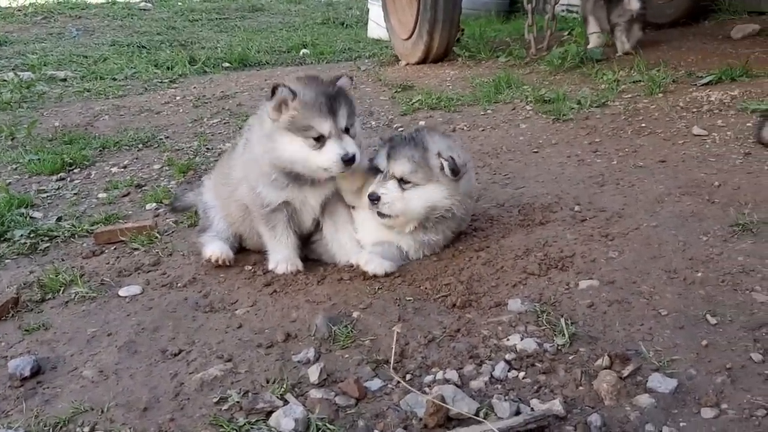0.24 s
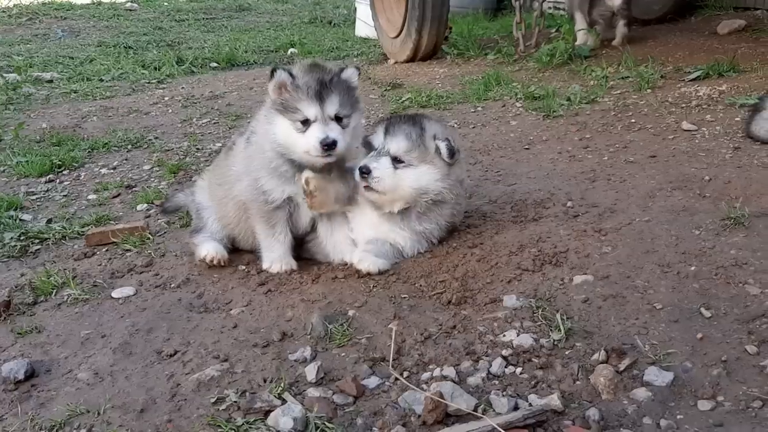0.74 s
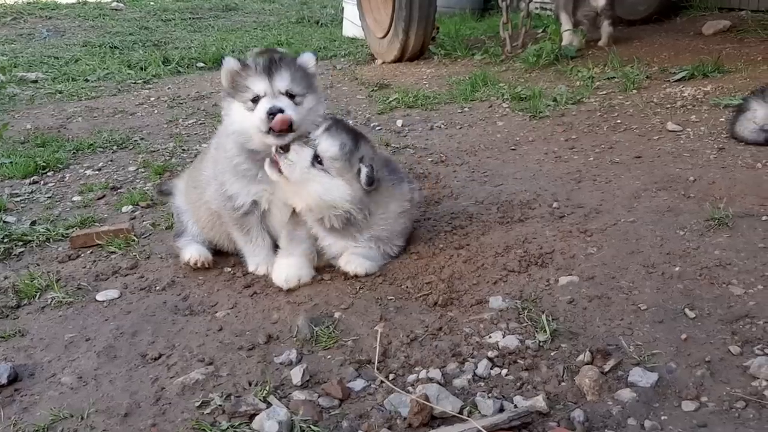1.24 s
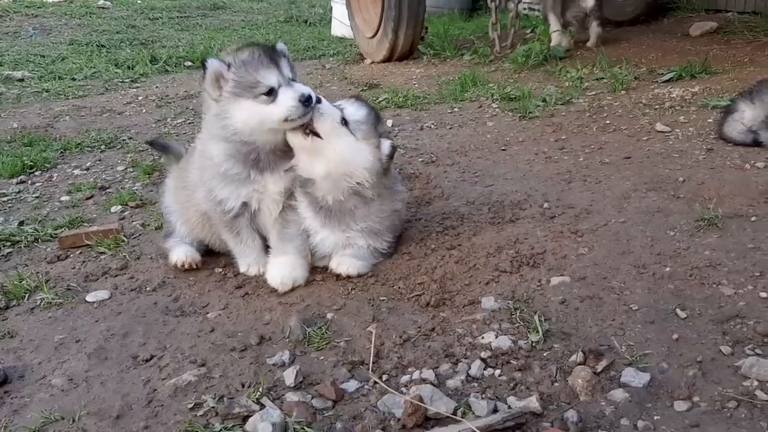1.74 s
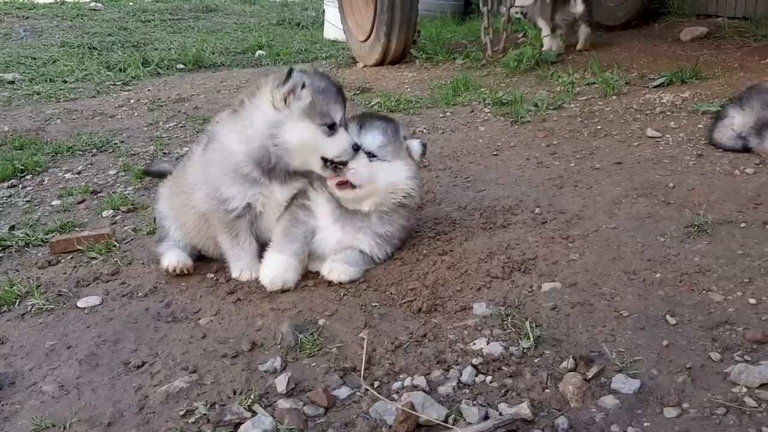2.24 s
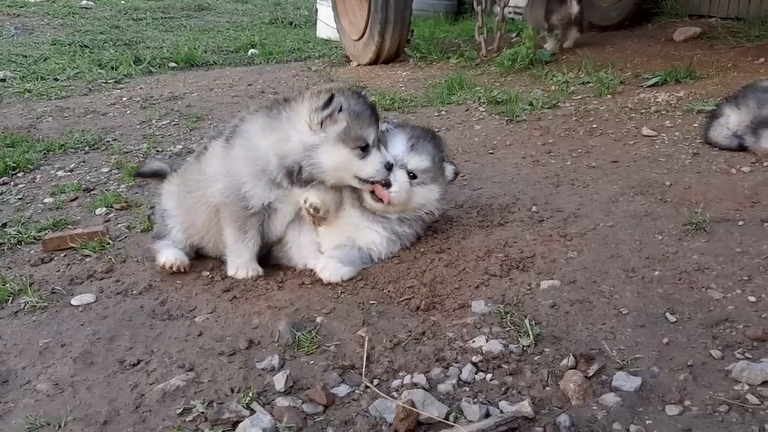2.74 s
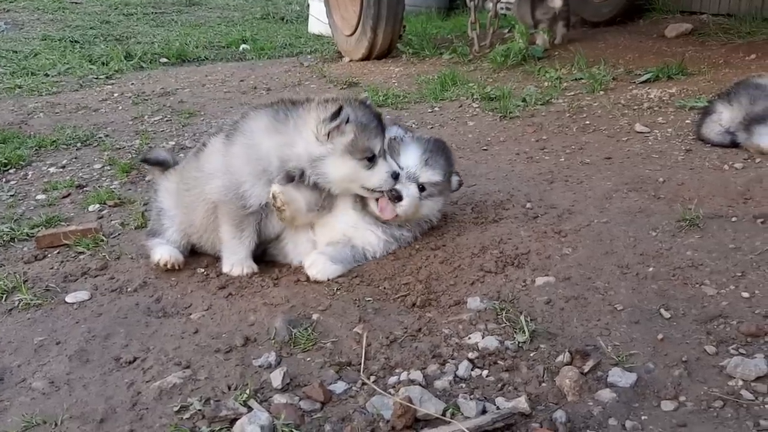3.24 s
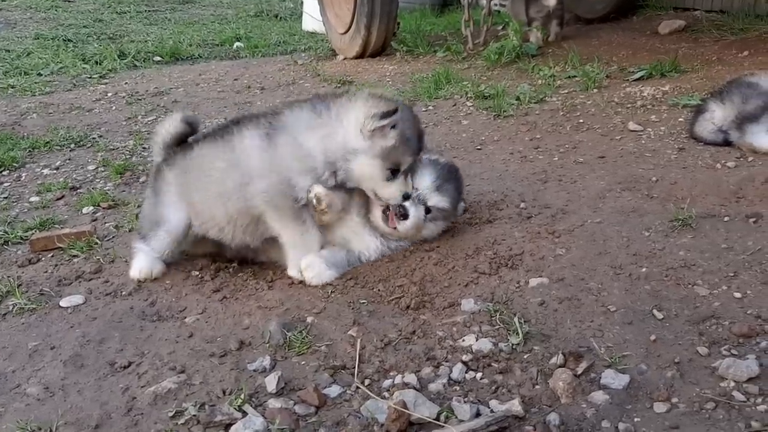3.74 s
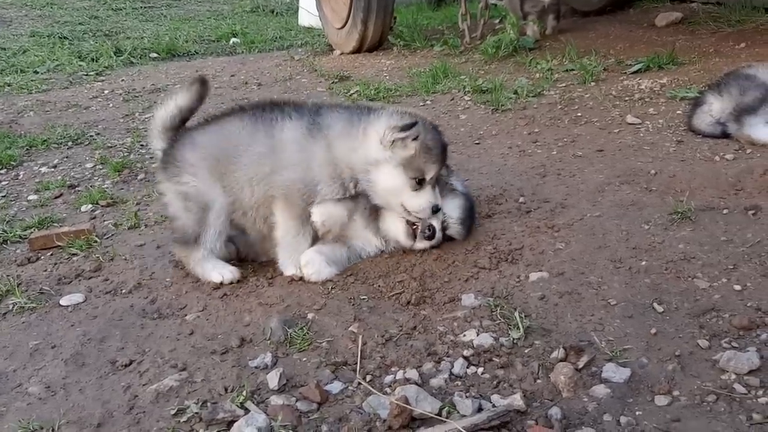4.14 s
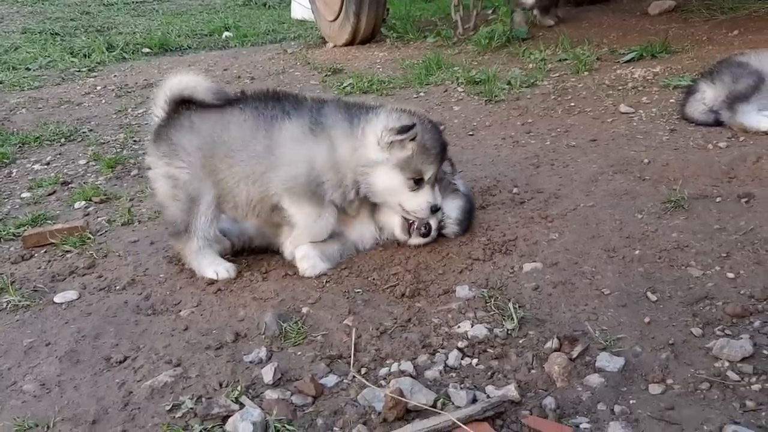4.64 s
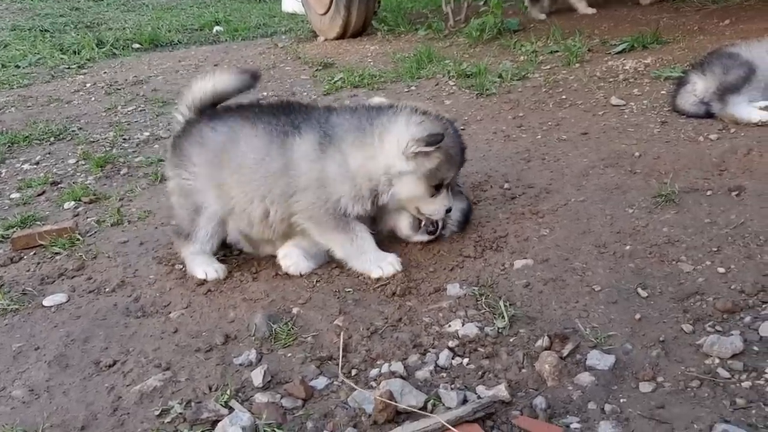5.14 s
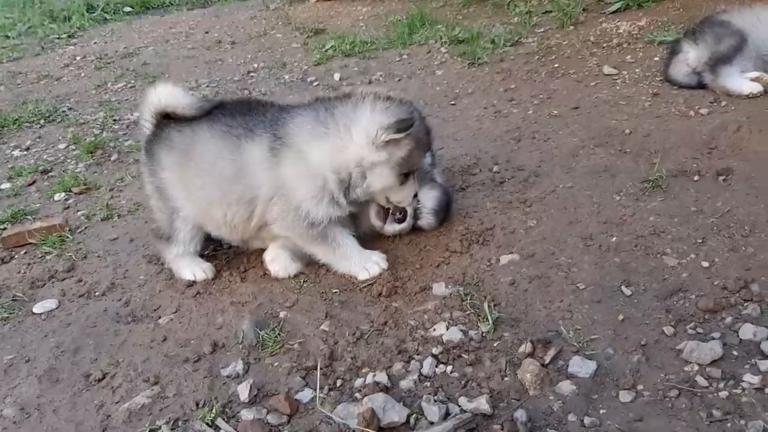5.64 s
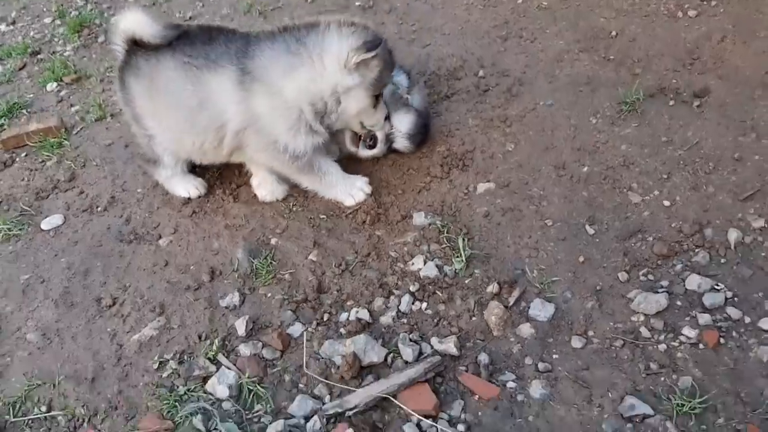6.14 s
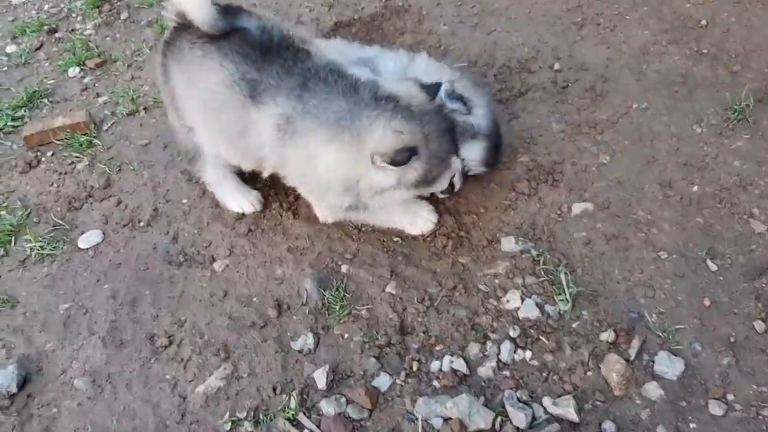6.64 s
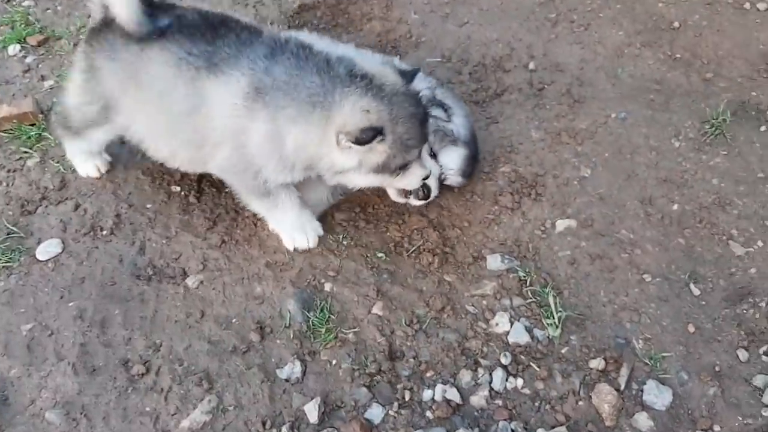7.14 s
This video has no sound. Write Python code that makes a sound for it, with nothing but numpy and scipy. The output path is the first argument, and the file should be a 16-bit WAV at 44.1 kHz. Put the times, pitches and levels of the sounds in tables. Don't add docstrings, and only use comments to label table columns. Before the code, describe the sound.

Outdoors, a puppy's quiet scuffle and tiny whimpers give way to four piercing, drawn-out whines, ending amid low wind thumps on the left.

```python
import sys
import numpy as np
from scipy import signal
from scipy.fft import rfft, irfft
from scipy.io import wavfile
from scipy.ndimage import uniform_filter1d

SR = 44100
rng = np.random.default_rng(int(sys.argv[2]) if len(sys.argv) > 2 else 0)


def boost(x):
    u = np.asarray(x, float) / 20
    return 10 ** u


def unload_wav(signal):
    wavfile.write(
        sys.argv[1],
        SR,
        np.round(np.clip(np.atleast_2d(signal).T, -1, 1) * 32767).astype(np.int16),
    )


N = 325458

# start/s, end/s, hoarse onset/0-1, onset length/s, hoarse ending/0-1
WHINES = [
    (3.647, 4.087, .1, .02, .6),
    (4.252, 5.668, .5, .03, .5),
    (5.845, 6.759, .3, .28, .8),
    (6.93, 7.378, .75, .16, .3),
]
CRACKS = [.12, .03, .03, .2]
# t/s, f/Hz
FOLD_PITCH = [
    [(3.647, 1350), (3.671, 1287), (3.7, 1378), (3.968, 1420), (3.988, 1336), (4.05, 1422), (4.072, 1346),
     (4.087, 1192)],
    [(4.252, 1262), (4.284, 1297), (4.306, 1363), (4.354, 1379), (4.7, 1325), (4.748, 1308)],
    [(4.762, 1272), (4.802, 1291), (4.818, 1231), (4.846, 1235), (4.888, 1180), (4.924, 1178),
     (4.953, 1239), (4.982, 1244), (5.044, 1174)],
    [(5.15, 1120), (5.384, 1152), (5.485, 1247), (5.565, 1228), (5.606, 1309), (5.645, 1303), (5.659, 1173),
     (5.668, 1195)],
    [(5.845, 1103), (5.873, 1121), (5.899, 1257), (5.921, 1354), (5.955, 1332), (6.045, 1409),
     (6.062, 1408), (6.119, 1301), (6.21, 1262)],
    [(6.3, 1291), (6.425, 1274), (6.489, 1295), (6.635, 1280), (6.7, 1314), (6.736, 1303), (6.743, 1234),
     (6.759, 1054)],
    [(6.93, 983), (6.947, 1029), (7.01, 1260), (7.06, 1244), (7.09, 1291), (7.102, 1341), (7.155, 1361),
     (7.245, 1269), (7.378, 1242)],
]
# t/s, level/dB
EFFORT = [
    [(3.647, -50.5), (3.671, -38), (3.778, -37), (3.892, -28), (3.985, -22.5), (4.012, -27), (4.03, -26),
     (4.075, -27), (4.087, -25.5)],
    [(4.252, -36), (4.276, -27.5), (4.368, -39), (4.502, -28), (4.544, -35.5), (4.649, -37), (4.75, -22.5)],
    [(4.764, -19.5), (4.793, -17), (4.829, -24), (4.886, -29), (4.98, -21), (5.095, -26.5), (5.154, -31.5)],
    [(5.396, -22.5), (5.467, -17.5), (5.517, -22.5), (5.559, -20.5), (5.638, -25), (5.659, -18),
     (5.668, -32)],
    [(5.845, -35), (5.877, -26), (5.898, -33), (5.92, -27.5), (6.013, -25.5), (6.056, -19), (6.092, -20),
     (6.209, -40.5)],
    [(6.266, -28), (6.387, -26), (6.451, -31.5), (6.487, -24.5), (6.66, -19), (6.729, -20.5), (6.759, -33)],
    [(6.93, -43.5), (6.968, -28), (6.996, -38.5), (7.026, -30), (7.042, -35.5), (7.158, -18.5),
     (7.278, -27.5), (7.327, -38), (7.378, -33.5)],
]
# t/s, opening level/dB, throat f/Hz, mouth f/Hz
MOUTH_EARLY = [
    [(3.647, -68.5, 2600, 4670), (3.72, -44.5, 3700, 4530), (3.82, -53, 4350, 5570),
     (3.864, -43.5, 3320, 5390), (3.963, -47, 3330, 3780), (3.982, -27, 3000, 4460),
     (4.02, -24, 3470, 4370), (4.087, -67, 3540, 4650)],
    [(4.252, -60, 2360, 4070), (4.29, -55.5, 2700, 4850), (4.45, -52, 3300, 4800),
     (4.56, -56.5, 3300, 4800), (4.69, -57, 3540, 4770), (4.752, -49.5, 3120, 3650)],
    [(4.764, -35, 2060, 3700), (4.8, -34, 2150, 3820), (4.822, -20, 2200, 3560), (4.846, -22, 2090, 3650),
     (4.885, -16.5, 2520, 2720), (4.93, -21.5, 2440, 3060), (4.96, -27.5, 1600, 3930),
     (5.02, -33, 2370, 2810), (5.14, -39.5, 2300, 2500)],
    [(5.152, -56, 2250, 2390), (5.16, -56, 2290, 5600), (5.18, -36, 2300, 5650), (5.25, -28, 2170, 5000),
     (5.424, -30.5, 2360, 5110), (5.446, -26.5, 2930, 3950), (5.588, -19.5, 3400, 4340),
     (5.638, -35.5, 2690, 4800), (5.668, -42, 2980, 3500)],
]
# t/s, opening level/dB, throat f/Hz, mouth f/Hz
MOUTH_LATE = [
    [(5.845, -49, 1930, 3940), (5.905, -17, 3560, 4380), (6.015, -22, 3770, 4750),
     (6.03, -15.5, 3630, 4550), (6.128, -33, 3500, 4640), (6.22, -34, 3500, 4080)],
    [(6.29, -26, 3440, 4540), (6.34, -34, 3080, 5000), (6.37, -28, 3060, 6100), (6.39, -26.5, 2920, 5970),
     (6.636, -26, 3070, 5620), (6.729, -27, 3310, 5990), (6.759, -36, 2000, 5700)],
    [(6.93, -49, 1930, 4530), (6.96, -23.5, 2880, 6000), (7.09, -23.5, 3470, 5830),
     (7.104, -16, 3680, 6050), (7.165, -22, 3930, 6140), (7.25, -28.5, 3240, 5900),
     (7.378, -28, 3320, 5500)],
]
# t/s, lips level/dB, teeth level/dB, teeth f/Hz
LIPS_AND_TEETH = [
    [(3.647, -12, 0, 11200), (3.807, -3, -4, 11300), (3.847, -3, 7.5, 9700), (3.969, -1, 2, 9650),
     (4.087, -2, 18, 11300)],
    [(4.252, -27, 18, 11600), (4.308, 1, -11, 10900), (4.454, -2, -12, 12700), (4.482, 1, -3.5, 10900),
     (4.72, -4.5, 2, 11000), (4.75, -6, 9, 10900)],
    [(4.76, 0, -1, 11100), (4.818, -1.5, 5.5, 9300), (5.026, -5, 3, 10100), (5.056, -4, 5.5, 9400),
     (5.14, 5, 7, 9900)],
    [(5.15, 0, 5, 10400), (5.344, -1, -13, 11900), (5.382, -5, 0, 10500), (5.668, 1, 4, 12400)],
    [(5.845, -6, 0, 11400), (5.878, 18.5, -2, 11600), (5.9, -9, 3, 11600), (6.069, -17, -5.5, 11300),
     (6.157, 3, 11, 9500), (6.24, -11, 5, 9800)],
    [(6.26, -7, 0, 10400), (6.314, -10.5, 2.5, 10100), (6.444, -7, -4.5, 12000), (6.49, 2, -1.5, 14000),
     (6.66, -2.5, 5, 13400), (6.759, 2.5, -3, 12700)],
    [(6.93, 3, -3, 11600), (7.01, -7, -9, 12500), (7.058, -4, 4, 11400), (7.15, -6, -9, 13000),
     (7.378, -2, -10, 11800)],
]
# f/Hz, level/dB
UPPER_TONE = [(5000, -34), (6200, -12), (7500, -7), (8700, -20.5), (10000, -21), (12500, -19.5),
              (15000, -23), (16500, -24)]
# t/s, left-right level/dB
HEAD_TURN = [
    [(3.647, -1), (3.867, 23), (3.995, 4), (4.041, 13), (4.087, -1)],
    [(4.252, -3.5), (4.35, 6), (4.734, -6), (4.846, 4), (4.972, -4.5), (5.072, 4.5), (5.488, -0.5),
     (5.63, 3)],
    [(5.845, 1), (6.067, 5), (6.157, 11), (6.675, 3), (6.723, 10), (6.759, 0)],
    [(6.93, -1), (7.05, 6), (7.262, 11.5), (7.378, -1)],
]
# t/s, left-right level/dB
OVERTONE_PAN = [(3.9, 2.5), (6.4, 3.5), (7.05, 7), (7.3, 5.5)]
# start/s, end/s, depth/0-1
SKIPPED_BEATS = [(3.307, 3.317, 0.55), (3.418, 3.436, .3), (4.262, 4.279, .14), (4.288, 4.32, 0.04),
                 (3.968, 3.985, 0), (6.935, 6.935, 0.75)]
# t/s, f/Hz, level/dB
WHIMPERS = [
    [(.264, 548, -69), (.268, 535, -38), (.273, 478, -79)],
    [(.296, 590, -53), (.302, 590, -52), (.314, 453, -55), (.332, 437, -54), (.346, 576, -49.5),
     (.352, 610, -56)],
    [(2.63, 920, -58), (2.644, 830, -48), (2.658, 813, -50.5), (2.668, 740, -55)],
    [(2.976, 660, -47.5), (2.986, 581, -43.5), (3.02, 596, -37), (3.03, 611, -59), (3.048, 624, -56)],
    [(3.303, 1070, -59), (3.326, 1215, -46), (3.358, 1287, -47.5), (3.396, 1315, -48), (3.42, 1183, -41.5),
     (3.432, 1050, -65)],
    [(3.445, 1037, -69), (3.46, 950, -49), (3.47, 840, -59)],
]
WHIMPER_OCTAVES = [-14, -17, -26, -25, -40, -24]
# peak t/s, airflow level/dB, half length/s
BREATHS = [(1.24, -74, 0.56), (1.56, -73, .07), (1.88, -71, 0.18), (2.8, -64.5, 0.057), (3.1, -66.5, 0.13),
           (3.27, -66, 0.2), (3.43, -59.5, 0.052), (3.57, -69.5, 0.032), (3.715, -57.5, 0.041),
           (3.85, -58, 0.11), (4, -58, 0.15), (4.14, -58, 0.074), (4.27, -57, 0.034), (4.44, -58, 0.06),
           (4.58, -56, 0.041), (4.89, -61.5, 0.4), (5.3, -64.5, 1), (5.67, -56, 0.037),
           (5.74, -61.5, 0.062), (6.1, -56.5, 0.06), (6.33, -58, 0.14), (6.6, -65, 0.51),
           (6.75, -55.5, 0.12), (6.94, -52, 0.0039), (7.05, -60.5, 0.16), (7.38, -58.5, 0.16)]
# f/Hz, level per Hz/dB
MUZZLE_TONE = [(300, -6.5), (700, 0), (1100, 2.5), (2100, 1.5), (2700, -9), (4500, -7), (7500, -18),
               (16500, -33)]
# peak t/s, rustle level/dB, half length/s
SCUFFLES = [(0, -67.5, 0.11), (.23, -74, 0.49), (.8, -72.5, 0.074), (1.2, -74.5, 0.6), (1.6, -74, 0.09),
            (1.9, -71.5, 0.23), (2.1, -74, 0.2), (2.55, -75.5, 0.27), (2.8, -69.5, 0.27), (3.42, -66, 0.1),
            (3.85, -61, 0.19), (4.04, -54, 0.063), (4.39, -56, 0.024), (4.9, -63, 0.63), (5.4, -63, 0.52),
            (5.66, -51, 0.03), (6.0, -57.5, 0.18), (6.3, -58.5, 0.38), (6.65, -57, 0.19),
            (6.74, -58, 0.051), (7.05, -59.5, 0.22), (7.3, -59.5, 0.43)]
# t/s, peak level/dB, ring f/Hz, treble level/dB
SMACKS = [(0.0024, -24, 4380, -12.5), (0.2216, -39, 4450, -34), (0.2325, -42, 4200, -40),
          (0.2642, -45.5, 4100, -7), (0.341, -44.5, 2370, -10), (0.382, -35, 2600, -10),
          (0.387, -29.5, 2700, -26), (0.3906, -22.5, 2600, -7), (0.398, -33, 2780, -16),
          (0.539, -47, 2490, -30), (0.5476, -24, 2350, -10.5), (0.5551, -29.5, 2480, -44),
          (0.563, -37.5, 2500, -25), (1.5048, -47, 1510, -35), (1.9736, -37.5, 1960, 0)]
# t/s, peak level/dB, ring f/Hz, treble level/dB
WIDE_TICKS = [(0.2116, -19, 4280, -1.5), (3.97, -30.5, 2040, -28), (4.324, -29.5, 1670, -36),
              (4.756, -36, 2000, -32), (5.011, -28, 4030, -4), (5.018, -32, 4570, -16),
              (5.121, -32, 3120, -15), (5.171, -44, 3000, -32), (5.782, -32, 1490, -31),
              (6.328, -22.5, 3150, -36), (6.476, -16.5, 2380, -37), (6.708, -24.5, 996, -19),
              (6.722, -38, 3500, -16), (6.777, -35, 700, -39), (7.323, -32.5, 5050, 2.5)]
# t/s, peak level/dB, lowest f/Hz
GRIT = [(.435, -56, 9000), (.455, -53, 9500), (.789, -49, 4500), (1.012, -53, 4500), (1.056, -51, 4500),
        (1.18, -51, 8000), (1.516, -47, 7000), (1.594, -58, 6000), (1.66, -55, 9500), (1.783, -64, 2800),
        (1.832, -45, 5000), (2.105, -49, 9000), (2.475, -51, 6000), (2.5574, -54, 9000),
        (3.2465, -43, 6000), (3.588, -50.5, 6000), (3.627, -42, 9500), (4.084, -31, 7500),
        (4.347, -41.5, 9000), (4.3818, -46, 8000), (4.389, -44, 9000), (5.13, -38.5, 9000),
        (5.7981, -58, 8100), (6.72, -33, 6000), (6.8517, -43, 7940), (7.218, -45, 8000), (7.25, -37, 8000),
        (7.291, -33, 8000), (7.338, -35, 9000)]
# f/Hz, t60/s
WALL_DECAY = [(1300, 0.3), (4000, 0.24), (9000, 0.05)]
# peak t/s, level/dB, half length/s
GUSTS = [
    (6.165, -51.5, 0.016),
    (6.225, -42, 0.022),
    (6.39, -45.5, 0.094),
    (6.58, -53.5, 0.16),
    (6.745, -34, 0.038),
    (6.8, -34, 0.031),
    (7.2, -57.5, 0.27),
]
# f/Hz, level per Hz/dB
GUST_TONE = [(25, -34), (45, 4), (70, 9), (130, -1), (250, -11.5), (600, -37)]
# f/Hz, level per Hz/dB
YARD_TONE = [(25, -28.5), (60, 2), (300, -9), (2500, -7.5), (3000, -25.5), (7000, -31.5), (12500, -24),
             (16000, -36.5)]
# t/s, level/dB
RUMBLE = [(0, -65.5), (1.2, -64), (2.3, -69.5), (2.7, -66.5), (2.85, -56), (3.1, -62.5), (3.6, -68.5),
          (4.5, -67.5), (4.9, -68), (5.6, -78), (6.1, -81)]
# f/Hz, likeness/0-1
PORT_LIKENESS = [(200, 0.97), (900, 0.14)]
# f/Hz, left-right level/dB
PORT_BALANCE = [(300, -0.5), (2400, 2.5), (6000, -2.5), (9000, -10.5)]
# f/Hz, level/dB
PORT_DIP = [(1450, 2), (1750, -1.5), (2100, 2.5), (7700, 0.5), (8600, -11.5), (9700, -1.5), (15700, 3),
            (15900, -22)]


def whine():
    hz = uniform_filter1d(follow(np.vstack(FOLD_PITCH))[0], size=300)
    effort_db = uniform_filter1d(follow(np.vstack(EFFORT))[0], size=200)
    open_db, passed = mouth(hz)
    partial_db = [effort_db] + [open_db + 10 * np.log10(share) for share in passed]
    bright_db = -31.5 + 0.027 * (hz - hz.mean()) + 0.18 * effort_db
    bright_db = bright_db + 0.29 * (open_db + 10 * np.log10(sum(passed[:3])))
    lips_db, teeth_db, teeth_hz = uniform_filter1d(follow(np.vstack(LIPS_AND_TEETH)), size=200)
    low_pan, high_pan = follow(np.vstack(HEAD_TURN))[0], follow(OVERTONE_PAN)[0]
    turn = 2 * np.pi * np.cumsum(hz * (1 + 0.00317 * wander(60))) / SR
    hoarse, shared = hoarseness(), wander(110)
    calls = [row[:2] for row in WHINES]
    tired = gate([(start + 0.05, end - .025) for start, end in calls], 0.05, 0.025)
    out = np.zeros((2, N))
    for k in range(1, 14):
        if k <= 4:
            db = partial_db[k - 1]
        else:
            db = bright_db + read(UPPER_TONE, k * hz) + 3 * wander(14) - 5 * hoarse * (k > 6)
            ring_db = 20.5 * (1 / (1 + (2 * (k * hz - teeth_hz) / 4400) ** 2) - .5)
            db = db + np.where(k * hz < 8800, lips_db, teeth_db + ring_db)
        if k == 5:
            db = np.maximum(db, partial_db[4] - 24 + 10 * hoarse)
        if k == 1:
            pan = low_pan
            lead = .75 + .4 * wander(5)
            flutter_db = hoarse * 2 * shared
        else:
            pan = high_pan + read(PORT_BALANCE, k * hz) + 2.9 * wander(6)
            lead = 1.0 + .55 * wander(5)
            beading_db = 5 - 2 * shared ** 2 - 3 * wander(120) ** 2
            flutter_db = hoarse * (beading_db + (.3 + 1.1 * hoarse) * wander(1200))
        smear_db = 3 * wander(350) * (k > 6)
        level = np.sqrt(2) * boost(db + flutter_db + smear_db) / np.maximum(np.cos(lead / 2), .6)
        phase = k * turn + np.array([lead, -lead]) / 2 + k * k
        out += level * (1 if k <= 5 else tired) * sides(pan) * np.sin(phase)
    halves = np.sin(turn / 2) + boost(5 * wander(250)) * np.sin(1.5 * turn + .6 * wander(200))
    return (out + skipping() * boost(effort_db) * halves) * gate(calls, 0.0021, 0.0095)


def mouth(hz):
    open_db, *peaks_hz = uniform_filter1d(follow(np.vstack(MOUTH_EARLY + MOUTH_LATE)), size=80)
    passed = []
    for k in range(2, 6):
        resonance = sum((1 + (2 * (k * hz - peak) / 720) ** 2) ** -2 for peak in peaks_hz)
        passed.append(boost(-30) ** 2 + resonance)
    return open_db, passed


def hoarseness():
    clear, settle_s = .15, .05
    points = []
    for (start, end, onset, lasts, ending), crack in zip(WHINES, CRACKS):
        points += [(start, onset), (start + lasts, onset), (start + lasts + settle_s, clear)]
        points += [(end - crack - .015, clear), (end - crack, ending), (end, ending)]
    return follow(points)[0]


def skipping():
    return sum(np.clip(depth, 0, 1) * gate([(start, end)], 0.004, 0.0033)
               for start, end, depth in SKIPPED_BEATS)


def whimpers():
    points = [(*point, over) for rows, over in zip(WHIMPERS, WHIMPER_OCTAVES) for point in rows]
    hz, db, over_db = follow(points)
    turn = 2 * np.pi * np.cumsum(uniform_filter1d(hz, size=200) * (1 + 0.005 * wander(80))) / SR
    soft = gate([(rows[0][0], rows[-1][0]) for rows in WHIMPERS], .004, .006)
    tone = np.sin(turn) + skipping() * np.sin(turn / 2)
    tone += boost(over_db + 3 * wander(90)) * np.sin(2 * turn)
    tone += boost(np.maximum(over_db - 14, -28)) * np.sin(3 * turn)
    tone += boost(-25) * (wander(500) * np.sin(turn) + wander(900) * np.sin(2.3 * turn))
    return np.sqrt(2) * tone * boost(uniform_filter1d(db, size=150) + .8 * wander(120)) * soft


def panting():
    air = hiss(MUZZLE_TONE, (1600, 2100), lambda hz: 0.26 + 0 * hz, patchy_db=3.4)
    return air * swells(BREATHS)


def smacks():
    out, t = np.zeros((2, N + 2000)), np.arange(2000) / SR
    broad = signal.butter(2, (800, 3600), "bandpass", fs=SR, output="sos")
    treble = signal.butter(2, (6300, 15500), "bandpass", fs=SR, output="sos")
    snaps = [(*row, 750, .22) for row in SMACKS] + [(*row, 1700, .12) for row in WIDE_TICKS]
    for s, db, hz, treble_db, width, wet in snaps:
        decay = np.exp(-t / .0013) + wet * np.exp(-t / .0042)
        burst = rng.standard_normal((2, len(t))) * decay * np.minimum(t / .0006 + .3, 1)
        burst[1] = 0.6 * burst[0] + 0.8 * burst[1]
        r = np.exp(-np.pi * width / SR)
        hollow = [1, -2 * r * np.cos(2 * np.pi * hz / SR), r * r]
        ring = signal.lfilter([1, 0, -1], hollow, signal.lfilter([1], hollow, burst))
        puff = signal.sosfilt(broad, burst)
        spit = signal.sosfilt(treble, burst) * [[.5], [1.4]]
        snap = ring / abs(ring).max() + 0.18 * puff / abs(puff).max()
        snap = snap + boost(treble_db + 10) * spit / abs(spit).max()
        out[:, round(s * SR):][:, :len(t)] += boost(db - 0.5) * snap
    return out[:, :N]


def grit():
    out, t = np.zeros((2, N + 400)), np.arange(400) / SR
    for s, db, low_hz in GRIT:
        burst = rng.standard_normal((2, len(t))) * np.exp(-t / .001)
        band = signal.butter(2, (low_hz, 14500), "bandpass", fs=SR, output="sos")
        tick = signal.sosfilt(band, burst + burst[0])
        out[:, round(s * SR):][:, :len(t)] += boost(db) * tick / abs(tick).max() * [[.8], [1.6]]
    return out[:, :N]


def rustle():
    bright = [(2500, -11.5), (5000, -11.0), (8600, -10.5), (10000, -10.5), (12500, -5.5),
              (15600, -22), (16200, -22.0)]
    grain = boost(1.8 * wander(40))
    fizz = hiss(bright, (9000, 15500), lambda hz: .3 + 0 * hz, patchy_db=1.5)
    return fizz * grain * swells(SCUFFLES)


def wall(x):
    taps = np.zeros((2, SR // 2))
    at = np.arange(900, SR // 2 - 20, 20) + rng.integers(0, 20, (2, (SR // 2 - 901) // 20))
    np.put_along_axis(taps, at, rng.choice([-1., 1.], at.shape), 1)
    hz, t, z = signal.stft(taps, SR, nperseg=256)
    shed_db = 6.0 * np.exp(-((t - .055) / .018) ** 2)
    tail = signal.istft(z * boost(-60 * t / read(WALL_DECAY, hz)[:, None] + shed_db), SR, nperseg=256)[1]
    return signal.fftconvolve(x.mean(0)[None], tail / np.linalg.norm(tail[0]), axes=1)[:, :N]


def wind():
    z = rfft(rng.standard_normal((2, N))) * boost(read(GUST_TONE, np.fft.rfftfreq(N, 1 / SR)))
    lumps = boost(2.0 * np.array([wander(40), wander(6.3)]))
    facing = 1.4 * sides(12.)[:, None]
    return evened(irfft(z, N) * lumps) * swells(GUSTS) * facing


def yard():
    floor = boost(-66.5) * hiss(YARD_TONE, (30, 16000), lambda hz: read(PORT_LIKENESS, hz), patchy_db=2.5)
    low = [(25, -33.5), (50, 2.5), (100, 2.0), (200, -3.0), (400, -13.0), (900, -49.5)]  # f/Hz, level/dB
    z = rfft(rng.standard_normal((2, N))) * boost(read(low, np.fft.rfftfreq(N, 1 / SR)))
    z[1] = 0.62 * z[0] + 0.33 * z[1]
    return floor + evened(irfft(z, N)) * boost(follow(RUMBLE)[0])


def hiss(colour, band, like, patchy_db):
    frames, hz = N // 128 + 5, np.fft.rfftfreq(512, 1 / SR)
    a, b, c, d, patches = rng.standard_normal((frames, 257, 5)).T
    patches = uniform_filter1d(uniform_filter1d(patches, size=6, axis=0), size=16, axis=1)
    same, left = np.clip(like(hz), -1, 1)[:, None], a + 1j * b
    z = np.array([left, same * left + np.sqrt(1 - same ** 2) * (c + 1j * d)])
    z *= boost(read(colour, hz)[:, None] + patchy_db * evened(patches))
    z *= sides(read(PORT_BALANCE, hz))[:, :, None]
    x = signal.istft(z, nperseg=512, noverlap=384)[1][:, :N]
    inside = signal.sosfilt(signal.butter(4, band, "bandpass", fs=SR, output="sos"), x.mean(0))
    return x / np.std(inside)


def swells(rows):
    t = np.arange(N) / SR
    return np.sqrt(sum(boost(db - 14 * abs(t - s) / half) ** 2 for s, db, half in rows))


def follow(rows):
    s, *columns = np.transpose(rows)
    return [np.interp(np.arange(N) / SR, s, c) for c in columns]


def gate(spans, rise, fall):
    t = np.arange(N) / SR
    edges = [np.minimum((t - start) / rise + 1, (end - t) / fall + 1) for start, end in spans]
    return np.clip(np.max(edges, axis=0), 0, 1) ** 2


def wander(rate):
    steps = rng.standard_normal(round(rate * N / SR) + 2)
    return signal.resample(steps, N)


def sides(db):
    pair = boost(np.array([db / 2, -db / 2]))
    return pair / pair.mean(0)


def read(points, hz):
    f, value = np.transpose(points)
    return np.interp(np.log(hz + 1), np.log(f + 1), value)


def evened(x):
    return x / np.sqrt(np.mean(x ** 2) + 1e-20)


def scene():
    voices, small, snaps = whine(), whimpers(), smacks() + grit()
    echo = wall(boost(-23.5) * voices + boost(-41) * (snaps + small))
    return voices + small + snaps + echo + panting() + rustle() + yard() + wind()


def low_pass(x):
    return signal.sosfilt(signal.butter(12, 16840, fs=SR, output="sos"), x)


def record(dry):
    ported = irfft(rfft(dry) * boost(read(PORT_DIP, np.fft.rfftfreq(N, 1 / SR))), N)
    return low_pass(ported)


dry = scene()
out = record(dry)
unload_wav(out)
```